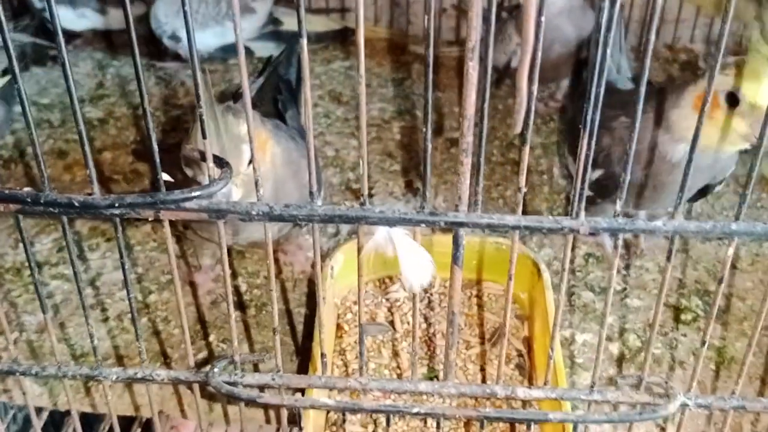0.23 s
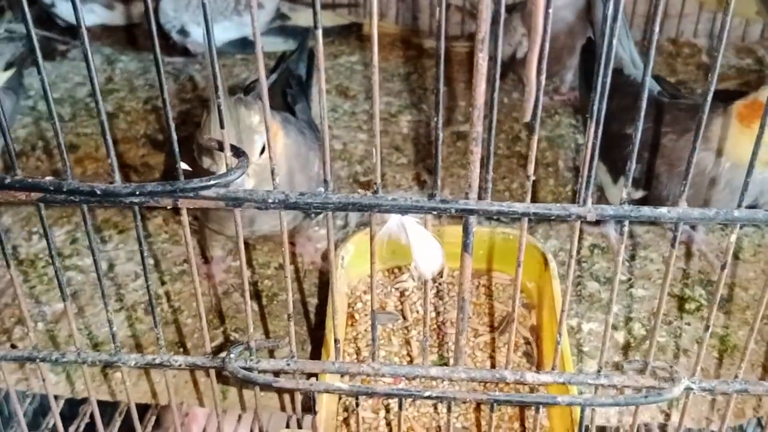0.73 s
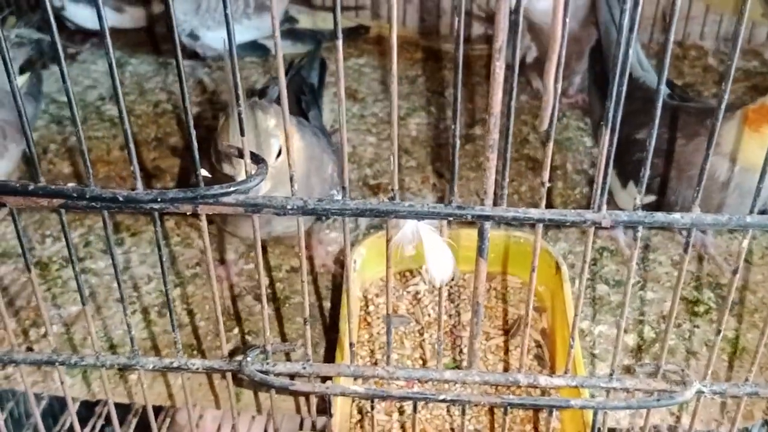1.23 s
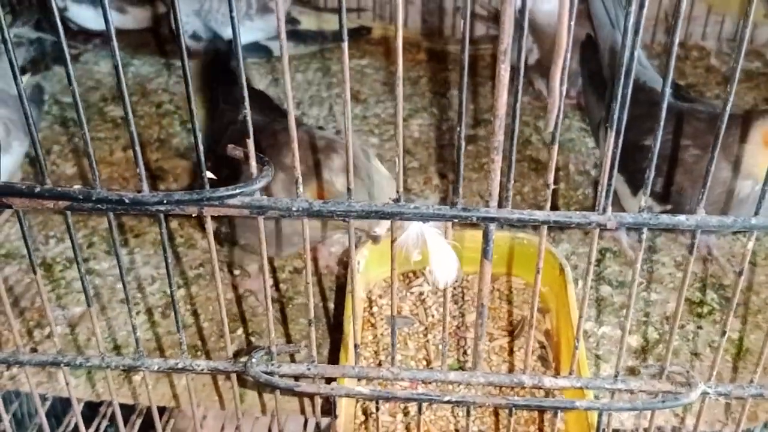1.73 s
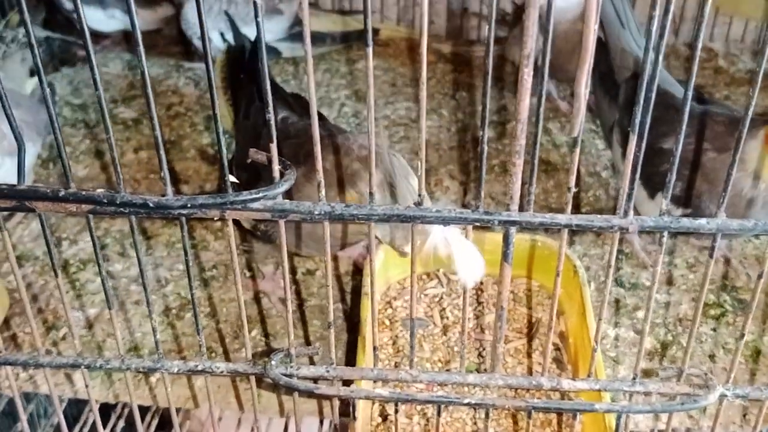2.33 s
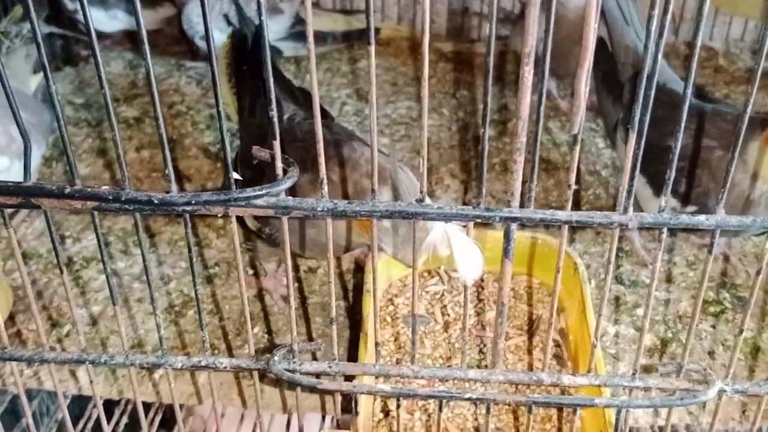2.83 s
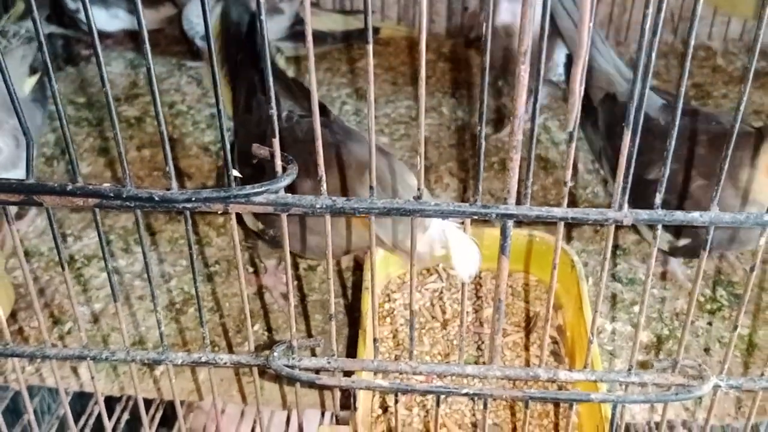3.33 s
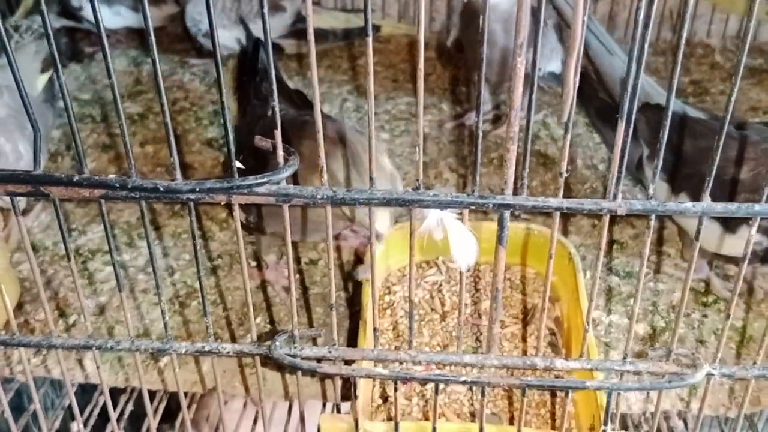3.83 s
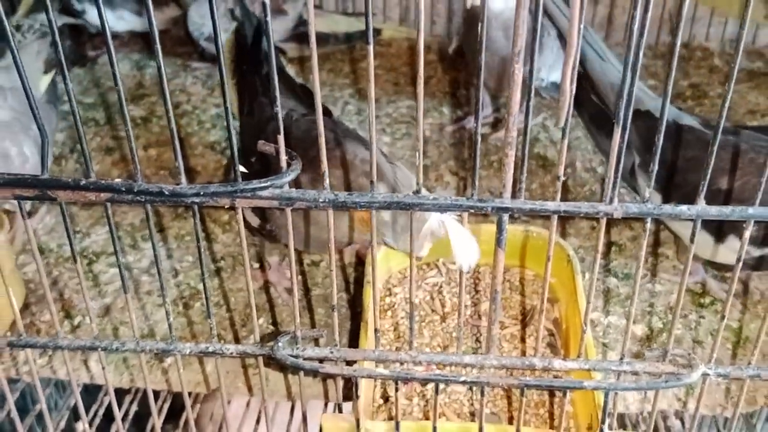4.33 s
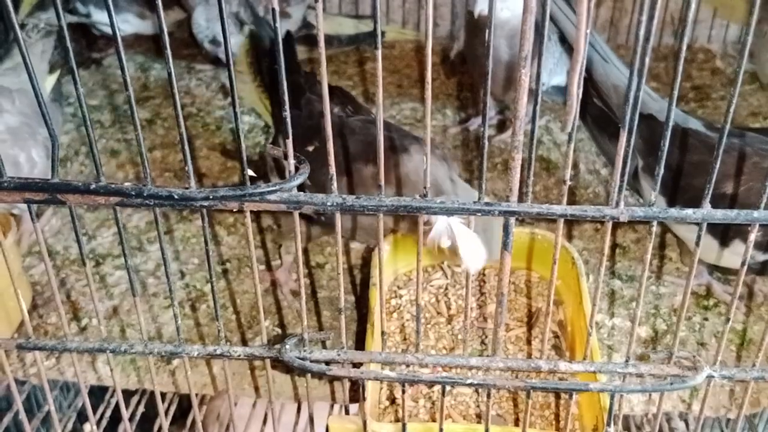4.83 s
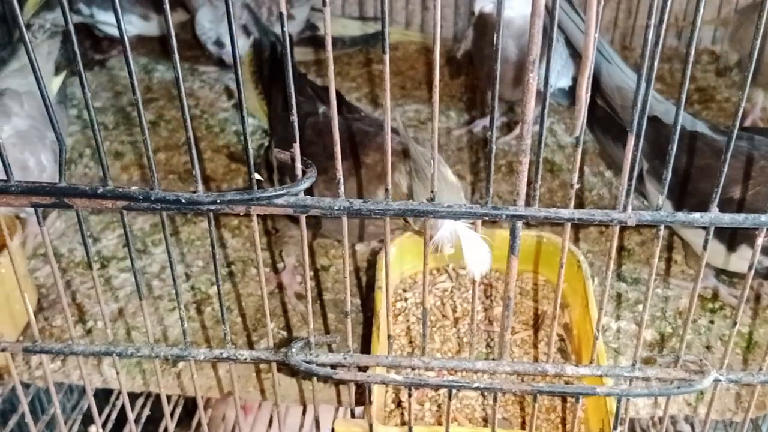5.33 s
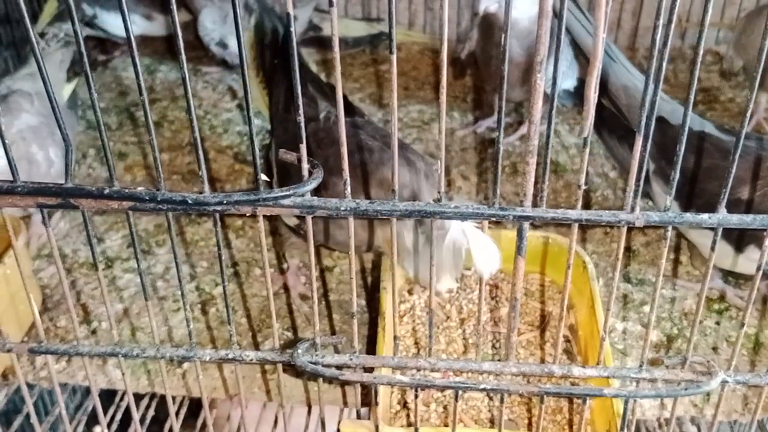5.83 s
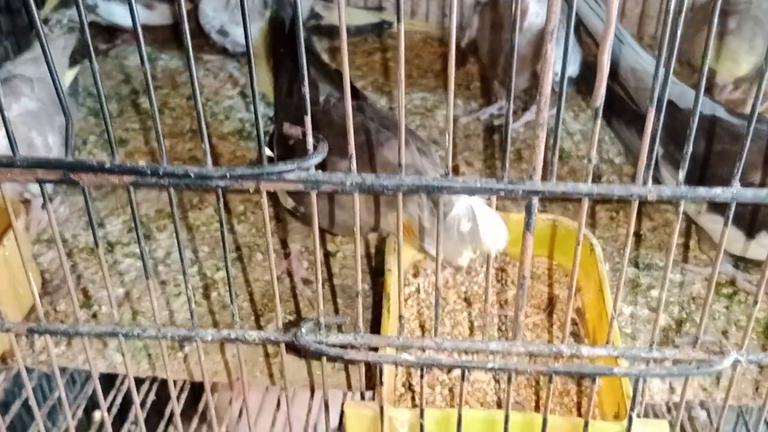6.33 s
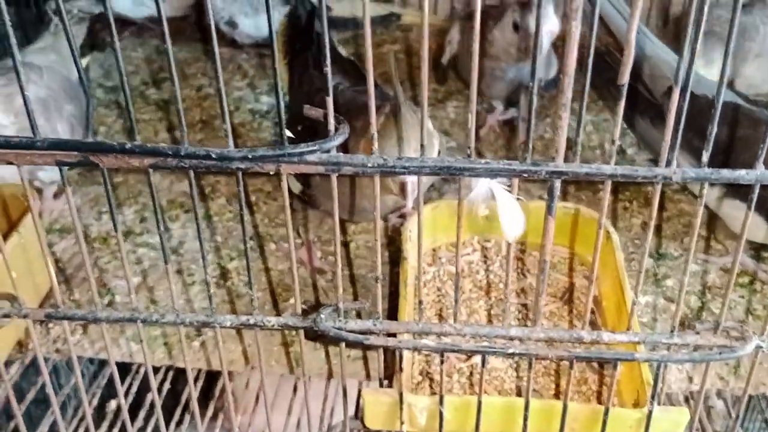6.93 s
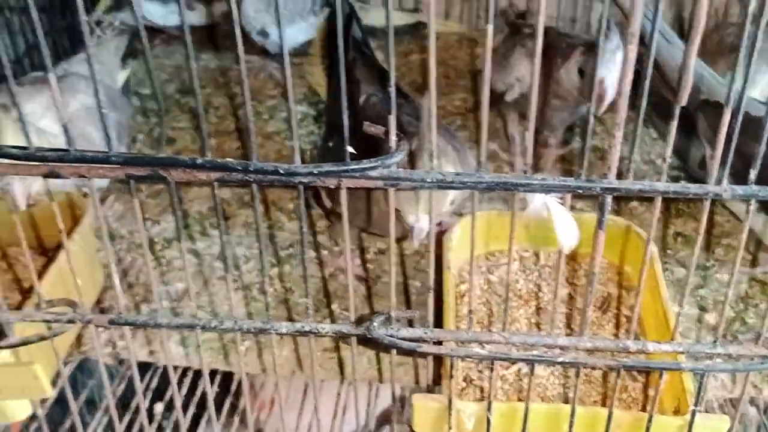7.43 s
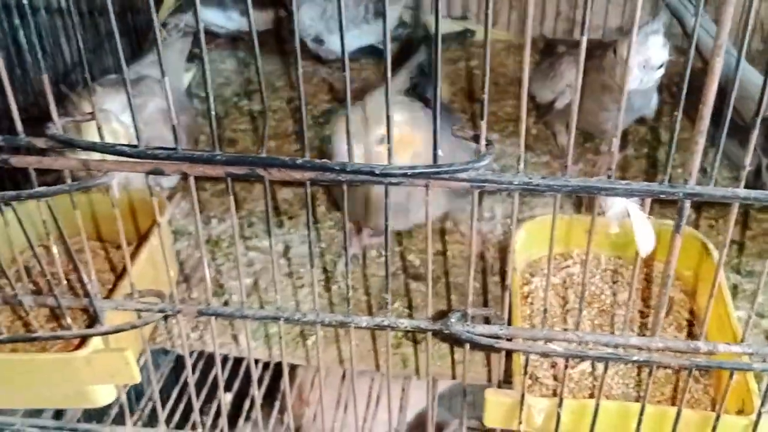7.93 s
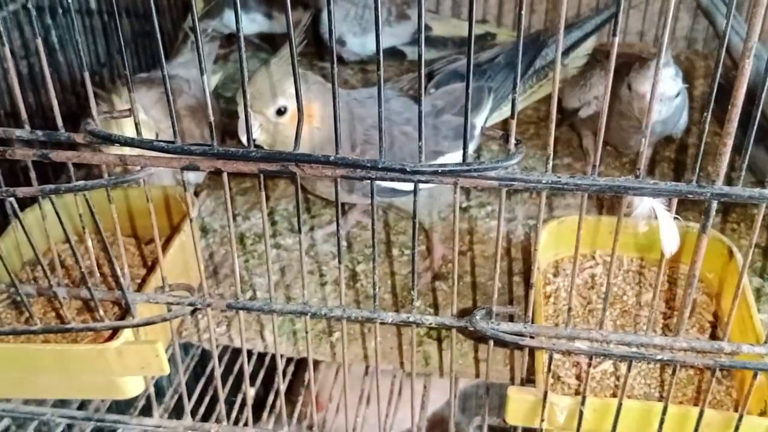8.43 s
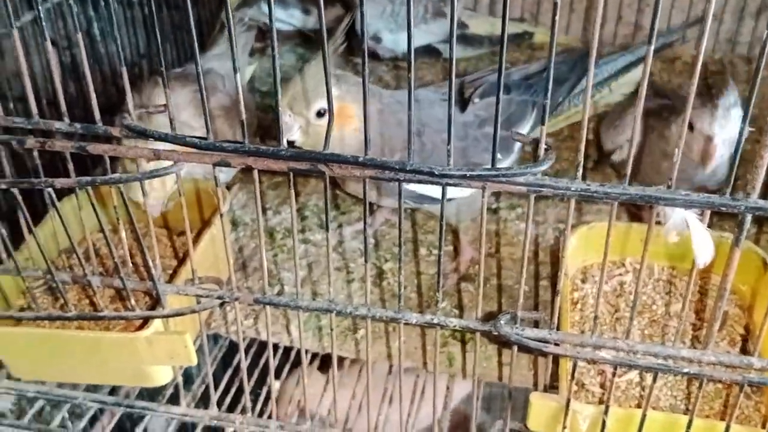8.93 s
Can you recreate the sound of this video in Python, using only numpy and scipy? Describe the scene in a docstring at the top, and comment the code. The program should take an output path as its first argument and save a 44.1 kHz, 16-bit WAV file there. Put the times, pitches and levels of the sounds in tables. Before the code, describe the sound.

Cockatiels whistle in trembling arched calls, chirp and squawk hoarsely close up in a hard-walled aviary, with a faint hum and brief abrupt silences.

```python
"""Cockatiels whistle in arched, trembling calls, heard close up in a small hard-walled aviary.
A harmonic syrinx tone sings these whistles, short chirps, swooping chatter, screams and a thin warble.
Irregularly pulsed noise and lurching tones make hoarse squawks, high rasps, soft clucks and one knock.
Shaped noise gives wing flutters, swelling soft noise, a low wavering hum and a wash of birds further off.
Five times the sound cuts to dead silence for about 0.3 s."""
import sys
import numpy as np
from scipy import signal
from scipy.fft import rfft, irfft, next_fast_len
from scipy.io import wavfile
from scipy.ndimage import map_coordinates

SR = 44100
rng = np.random.default_rng(int(sys.argv[2]) if len(sys.argv) > 2 else 0)


def waveform_to_disk(signal):
    """Save audio, clipped to [-1, 1], as 16-bit WAV at the path in sys.argv[1]."""
    frames = np.transpose(np.atleast_2d(signal))
    scaled = np.clip(frames, -1, 1) * 32767
    samples = np.round(scaled).astype(np.int16)
    wavfile.write(sys.argv[1], SR, samples)


N = 405279
TIME = np.arange(N) / SR  # s
# every level_db below is relative: sources add their own trims, colours and room


def undb(db):
    """Decibels to gain."""
    return 10 ** (np.asarray(db) / 20)


def unit(x):
    """Scale to rms 1."""
    return x / np.sqrt(np.mean(x ** 2) + 1e-18)


def gain_at(hz, colour):
    """Gain of a (freq_hz, gain_db) colour at these frequencies."""
    points, db = np.transpose(colour)
    return undb(np.interp(np.log(hz + 1), np.log(points), db))


def tint(x, colour):
    """Filter a sound by a colour."""
    size = next_fast_len(N + 4096)
    hz = np.arange(size // 2 + 1) * SR / size
    return irfft(rfft(x, size) * gain_at(hz, colour), size)[:N]


def noise(colour):
    """Coloured noise of rms 1."""
    return unit(tint(rng.standard_normal(N), colour))


def walk(rate):
    """Random drift of spread 1 that heads for a new value rate times a second."""
    values = rng.standard_normal(N // 16)
    # straight lines between values lose spread; the root restores it
    return np.sqrt(3 / 2) * np.interp(TIME * rate, np.arange(N // 16), values)


def gate(start, end, attack, release):
    """The samples of one call and its smooth opening and closing."""
    span = slice(max(int((start - attack / 2) * SR), 0), int((end + release / 2) * SR))
    t = TIME[span]
    opening = np.clip(np.minimum((t - start) / attack, (end - t) / release) + .5, 0, 1)
    return span, np.sin(opening * np.pi / 2) ** 2


def bursts(table, attack, release):
    """Loudness over time of (start_s, length_s, level_db) calls, each swelling towards its middle."""
    out = np.zeros(N)
    for start, length, db in table:
        span, opening = gate(start, start + length, attack, release)
        arch = np.sqrt(np.hanning(len(opening)))
        out[span] += opening * arch * undb(db + 3.0)  # 3 dB makes up for the arch
    return out


def patchy(x, depth_db, rate, size):
    """Let size bands of a sound flicker, each on its own, rate times a second."""
    hz, t, spectra = signal.stft(x, SR, nperseg=1024)
    chance = rng.standard_normal((int(N / SR * rate) + 2, size))
    band = np.sqrt(hz / hz[-1]) * (size - 1)
    flicker = map_coordinates(chance, np.meshgrid(t * rate, band), mode="mirror")
    return unit(signal.istft(spectra * undb(depth_db * flicker), SR)[1][:N])


def harsh(colour, pulse_hz, depth):
    """Noise chopped by pulses of wandering rate, ringing in a colour."""
    phase = 2 * np.pi * np.cumsum(pulse_hz * (1 + 0.26 * walk(110))) / SR
    return unit(tint(np.exp(depth * np.cos(phase)) * rng.standard_normal(N), colour))


# loudness line of the low hum: time_s [s], level_db [dB]
HUM_LEVELS = [(.15, -62), (.45, -33), (.84, -36), (1.15, -50.5), (1.85, -45.5), (2.2, -39), (5.01, -39),
              (5.91, -34.5), (6.75, -33.5), (7.61, -37), (8.1, -47), (8.45, -33.5), (9.11, -38)]
# spectrum of the hum: freq_hz [Hz], gain_db [dB]
HUM_COLOUR = [(27, -49.5), (64, -20), (96, -0.5), (148, 4), (186, -16), (305, -21.5), (4000, -94.5)]
# spectrum of the distant wash: freq_hz [Hz], gain_db [dB]
WASH_COLOUR = [(41, -27.5), (470, -5.5), (660, -4), (850, -4.5), (1310, 3.5), (2110, 4.5), (3010, -9),
               (4210, -31.5), (5600, -35.5), (6600, -18), (7600, -17), (9010, -41.5), (15100, -72)]


def background(drone_db, far_db):
    """An uneven low hum and the wash of birds further off, both from flickering noise."""
    rumble = patchy(noise(HUM_COLOUR), depth_db=5.0, rate=17, size=170)
    level_db = np.interp(TIME, *np.transpose(HUM_LEVELS))
    waver_db = 2.4 * np.tanh(walk(7))
    hum = rumble * undb(drone_db + level_db + waver_db)
    wash = patchy(noise(WASH_COLOUR), depth_db=6.2, rate=14, size=90)
    return hum + undb(far_db) * wash


# swells of soft broadband noise around the calls: loudest_s [s], length_s [s], level_db [dB]
NOISE_SWELLS = [(0.053, 0.32, -35), (0.451, 0.2, -36.5), (2.974, 0.34, -38), (3.259, 0.15, -34.5),
                (3.58, 0.61, -39.5), (4.39, 0.4, -33.5), (5.932, 0.99, -37.5), (6.868, 1, -38),
                (8.068, 0.52, -35.5), (8.28, 0.3, -38), (9.14, 0.1, -35)]
# spectrum of the soft noise: freq_hz [Hz], gain_db [dB]
SOFT_COLOUR = [(50, -28.5), (255, -14), (460, -16), (640, 0), (1360, -4), (2810, -1), (4300, -25.5),
               (7020, -17.5), (9020, -44.5), (15200, -67.5)]
NOISE_REST_DB = -46  # soft noise between the swells, before the trim


def swelling_noise(level_db):
    """Soft, flickering broadband noise rises and falls in straight-sided swells."""
    swell = undb(NOISE_REST_DB)
    for loudest, length, db in NOISE_SWELLS:
        swell = swell + undb(db) * np.maximum(1 - 2 * np.abs(TIME - loudest) / length, 0)
    soft_noise = patchy(noise(SOFT_COLOUR), depth_db=3.5, rate=22, size=110)
    return soft_noise * swell * undb(level_db + 4.53 * walk(32))


# wing flutters: start_s [s], length_s [s], level_db [dB]
FLUTTERS = [(5.801, 0.15, -42), (6.471, 0.1, -44), (6.69, 0.14, -42), (7.97, 0.2, -45)]
# spectrum of the air the wings push: freq_hz [Hz], gain_db [dB]
FLUTTER_COLOUR = [(61, -30.5), (215, 4.5), (360, 12.5), (500, 5), (2010, -4.5), (12000, -75.5)]


def wings(level_db):
    """Wings push air: low noise in short bursts of unsteady level."""
    air = noise(FLUTTER_COLOUR) * bursts(FLUTTERS, attack=0.059, release=0.017)
    return air * undb(level_db + 0.89 * walk(41))


# a rattling knock in the cage: start_s [s], length_s [s], level_db [dB]
KNOCKS = [(.922, 0.022, -29.5)]


def knock():
    """Something bumps in the cage and chatters briefly against it: a burst of pulsed noise."""
    body = [(300, -26), (600, 2), (1300, 2), (4000, -31.5)]  # freq_hz, gain_db
    return harsh(body, pulse_hz=190, depth=1.6) * bursts(KNOCKS, attack=.002, release=0.011)


# soft low clucks: start_s [s], length_s [s], level_db [dB]
CLUCKS = [(4.339, 0.026, -35), (4.951, 0.017, -38), (6.954, 0.023, -30), (7.119, 0.019, -33.5)]


def clucks(level_db):
    """Brief hollow bursts of pulsed noise, ringing near 900 Hz."""
    hollow = [(400, -2.0), (650, 2.5), (920, 17.5), (1600, -40)]  # freq_hz, gain_db
    voice = harsh(hollow, pulse_hz=200.5, depth=0.53)
    return undb(level_db) * voice * bursts(CLUCKS, attack=0.012, release=0.0032)


# high hissing rasps: start_s [s], length_s [s], level_db [dB], beak_hz [Hz] (beak resonance)
RASPS = [(0.995, 0.047, -43.5, 6900), (1.079, 0.033, -45, 5950), (3.19, 0.061, -37, 6670),
         (3.295, 0.058, -36, 5830), (3.355, 0.099, -37.5, 6700), (3.754, 0.13, -39, 6300),
         (4.067, 0.046, -35.5, 6280), (4.754, 0.076, -31, 6800), (5.477, 0.064, -42, 6700),
         (6.295, 0.082, -34.5, 6520), (6.468, 0.043, -38, 6800), (7.527, 0.2, -45.5, 7100),
         (8.806, 0.053, -33.5, 6400), (9.068, 0.091, -39.5, 6900)]
# spectrum of the rasping voice: freq_hz [Hz], gain_db [dB]
RASP_COLOUR = [(2010, -23.5), (4010, 2), (5500, 5), (6700, 4.5), (8510, -12), (15100, -23.5)]


def rasps(level_db, spread, skirt_db):
    """A lurching buzz in uneven spurts of air rings each beak at its own pitch; soft rasps are duller."""
    phase = 2 * np.pi * np.cumsum(1380 * (1 + 0.068 * walk(130))) / SR
    pulses = np.exp(30 * (np.cos(phase) - 1))  # narrow, so rich in high overtones
    buzz = unit(tint(pulses, RASP_COLOUR + [(SR / 2, -60)]))
    buzz = unit(np.diff(buzz, prepend=buzz[0]))  # a small beak radiates the change of flow
    air = harsh(RASP_COLOUR, pulse_hz=169.0, depth=0.99)
    voice = patchy(air + buzz, depth_db=7.0, rate=35, size=60) * undb(2 * walk(190))
    out = np.zeros(N)
    loudest_db = max(db for _, _, db, _ in RASPS)
    for start, length, db, hz in RASPS:
        top_db = (db - loudest_db) * 0.64
        beak = [(hz / spread, skirt_db), (hz, 0), (hz * spread, skirt_db), (hz * 2, top_db)]
        out += unit(tint(voice, beak)) * bursts([(start, length, db)], attack=.03, release=.05)
    return undb(level_db) * out


# hoarse squawks: start_s [s], length_s [s], level_db [dB]
SQUAWKS = [(1.385, 0.086, -26), (2.04, 0.13, -28), (3.19, 0.072, -26), (3.351, 0.099, -31.5),
           (3.495, 0.092, -27), (3.64, 0.097, -23.5), (3.735, 0.062, -19.5), (4.071, 0.1, -22.5),
           (4.485, 0.062, -22.5), (4.771, 0.13, -24.5), (5.474, 0.085, -26.5), (6.171, 0.2, -26),
           (6.475, 0.22, -32), (6.735, 0.07, -27), (7.051, 0.082, -26.5), (8.222, 0.05, -22),
           (8.811, 0.093, -26.5), (9.051, 0.083, -23)]
# spectrum of hoarse breath: freq_hz [Hz], gain_db [dB]; it also airs the sung calls
SQUAWK_COLOUR = [(410, -17.5), (1310, -13), (2910, 1), (3610, -2.5), (4410, -14.5), (6510, -18),
                 (15200, -51)]


def squawks(loud_db, core_hz):
    """Chaotic voice: two lurching, sputtering tones, one per side of the syrinx, inside chopped air."""
    tones = np.zeros(N)
    for side in (.88, 1.14):
        hz = core_hz * side * (1 + .095 * walk(65) + .022 * walk(820))
        sputter = undb(2 * np.sqrt(2) * walk(150))
        tones += np.sin(2 * np.pi * np.cumsum(hz) / SR) * sputter
    air = harsh(SQUAWK_COLOUR, pulse_hz=242.6, depth=0.93)
    voice = patchy(air, depth_db=7, rate=45, size=60) + 1.3 * tones
    return undb(loud_db) * unit(voice) * bursts(SQUAWKS, attack=0.0063, release=0.04)


TRILL_SHARE = .1  # share of the pitch the trill bends at full slackness and roughness


def syrinx(calls, throat, trill_hz, scatter, flicker_db, air_db):
    """A throat-coloured harmonic tone whose membranes tremble when slack and steady near 3 kHz.

    Each call is (times, pitches, levels, overtone lift, roughness)."""
    tremble = np.sin(2 * np.pi * np.cumsum(trill_hz * (1 + .22 * walk(44))) / SR)
    jitter = scatter * walk(880)
    shimmer = undb(flicker_db * walk(165))
    air = undb(air_db) * noise(SQUAWK_COLOUR)
    k = np.arange(1, 8)[:, None]  # harmonic numbers
    out = np.zeros(N)
    for s, pitch, db, lift_db, rough in calls:
        span, opening = gate(s[0], s[-1], attack=.0045, release=0.0053)
        curves = (np.broadcast_to(v, len(s)) for v in (pitch, db, lift_db))
        hz, level, lift = (np.interp(TIME[span], s, v) for v in curves)
        # the voice is steadiest and purest on the resonance of the throat
        slack = np.clip(np.abs(hz - 3000) / 650, .7 * rough, 1)
        hz = hz * (1 + slack * rough * (TRILL_SHARE * tremble[span] + jitter[span]))
        phase = 2 * np.pi * np.cumsum(hz) / SR
        partials = gain_at(k * hz, throat) / k ** 1.65 * (k * hz < SR / 2)
        partials[1:] *= slack * undb(lift)
        tone = (partials * np.sin(k * phase)).sum(0)
        tone = np.sqrt(2) * tone / np.linalg.norm(partials, axis=0)  # even loudness
        breath = slack * rough * air[span]
        out[span] += (tone * shimmer[span] ** slack + breath) * opening * undb(level)
    return out


# a thin, high warble: time_s [s], pitch_hz [Hz], level_db [dB]
WARBLE = [(8.48, 6400, -49), (8.575, 7400, -45), (8.6, 6110, -32.5), (8.672, 6560, -36)]
# throat resonance, shared by warble, chirps and whistles: freq_hz [Hz], gain_db [dB]
THROAT = [(1210, -11), (1710, -4.5), (2310, 6.5), (3010, 9.5), (4210, -0.5), (5510, -9), (6810, -10.5),
          (9300, -30), (11800, -26), (15200, -36)]


def warble(lift_db, rough):
    """A thin, nearly pure syrinx tone with a deep, quick vibrato."""
    calls = [(*np.transpose(WARBLE), lift_db, rough)]
    return syrinx(calls, THROAT, trill_hz=69.2, scatter=.01, flicker_db=4, air_db=-22)


# screams, one curve for each bird: time_s [s], pitch_hz [Hz], level_db [dB], overtone_lift_db [dB]
SCREAMS = [
    [(8.205, 3103, -22, -15), (8.235, 3100, -16, -7.5), (8.25, 2606, -20.5, 4), (8.285, 2636, -29, -9)],
    [(8.25, 1750, -26, -5.5), (8.31, 2239, -16.5, -17), (8.345, 2850, -18, -4.5), (8.375, 2335, -23, -4),
     (8.435, 2275, -20, -20), (8.47, 2030, -25, -26.5)],
    [(8.34, 2254, -19, 1), (8.36, 1988, -18, -1), (8.405, 2006, -22, -14.5), (8.445, 2086, -20.5, -9.5),
     (8.475, 1567, -35, 4)],
]
# resonance of the wide-open beak: freq_hz [Hz], gain_db [dB]
OPEN_THROAT = [(2100, 0), (3000, -1), (4200, 14.5), (5800, 13), (8400, -0.5), (11300, 6), (13500, -1),
               (15000, -14)]


def screams(loud_db, rough):
    """Three birds scream across each other; wide-open beaks favour the overtones."""
    calls = [(*np.transpose(curve), rough) for curve in SCREAMS]
    voice = syrinx(calls, OPEN_THROAT, trill_hz=89.2, scatter=0.028, flicker_db=3, air_db=-20)
    return undb(loud_db) * voice


# swoops in the chatter: lowest_s [s], level_db [dB]
SWOOPS = [(4.804, -27), (4.842, -22), (5.481, -28), (6.503, -26.5)]


def swoops(length, low_hz, rim_hz, lift_db, rough):
    """In scolding chatter the pitch plunges and springs straight back, along a parabola."""
    u = np.linspace(-1, 1, 9)  # 0 at the lowest moment
    pitch = low_hz + (rim_hz - low_hz) * u ** 2
    return [(lowest + length * u / 2, pitch, db, lift_db, rough) for lowest, db in SWOOPS]


# short chirps: start_s [s], length_s [s], middle_hz [Hz], slide_hz [Hz] (first to last),
# level_db [dB] (middle), roughness [0-1]
CHIRPS = [(0.183, .008, 2550, 0.5, -18.5, 0.07), (0.846, 0.033, 3238, -350, -15, 0.3),
          (1.376, 0.014, 3660, -450, -23.5, 0.3), (1.426, 0.016, 3650, -350, -20, 0.3),
          (2.009, 0.05, 3353, -330, -29.5, 0.25), (2.597, 0.02, 3185, -500, -15, 0.46),
          (3.136, 0.067, 2966, 456, -32, .3), (3.482, 0.046, 3060, 2, -27, 0.5),
          (3.548, 0.016, 3460, -500, -20.5, 0.4), (3.704, .05, 3613, 1, -24, .4),
          (4.277, 0.016, 2756, -100, -21.5, 0.3), (4.337, 0.031, 2875, -800, -23, .6),
          (4.406, 0.036, 3335, -500, -25, 0.5), (4.43, 0.067, 2464, 49.5, -26.5, 0.1),
          (4.813, .049, 3440, -580, -19.5, 0.4), (4.861, .051, 3505, 54.5, -19, .8),
          (5.485, .036, 3374, 227, -19.5, 0.4), (5.549, 0.053, 3410, -200, -23.5, 0.5),
          (5.671, .068, 2990, -670, -33.5, 0.5), (6.16, 0.044, 2590, 173, -28.5, 0.77),
          (6.465, 0.031, 3096, 750, -23, 0.7), (6.499, .06, 4454, -100, -23, 0.2),
          (6.501, .135, 3404, 155.5, -24, 0.9), (6.651, 0.034, 3134, 124, -23.5, 0.87),
          (6.703, 0.019, 3610, -5, -25, 0.3), (6.73, .025, 3070, 346, -19.5, 0.5),
          (6.763, .04, 3577, 108.5, -23, 0.02), (7.507, 0.014, 2990, 870, -27.5, 0.77),
          (7.885, 0.037, 3604, 1, -30, 0.3), (7.915, 0.0254, 3110, 399, -19.5, 0.65),
          (7.945, 0.047, 3540, 96, -24.5, 0.4), (8.502, 0.036, 3294, -5, -27, 0.7),
          (8.577, 0.05, 3230, -950, -26.5, 0.16), (8.799, 0.044, 3030, -880, -26, 0.86),
          (8.84, 0.054, 3484, -31, -23, 0.82), (9.015, .022, 3510, 353, -26.5, .6),
          (9.036, 0.036, 2844, -5, -26, 0.77)]
CHIRP_BOW_HZ = 114  # both ends of a chirp droop by this much


def chirps(loud_db, taper_db, lift_db):
    """Quick, slightly bowed slides of pitch, clean or buzzy, loudest mid-chirp; swoops come between."""
    u = np.array([-1, 0, 1])  # first, middle, last
    calls = []
    for start, length, hz, slide, db, rough in CHIRPS:
        times = start + length * (u + 1) / 2
        pitch = hz + slide * u / 2 - CHIRP_BOW_HZ * u ** 2
        calls.append((times, pitch, db + taper_db * u ** 2, lift_db, rough))
    calls += swoops(length=0.02, low_hz=1837, rim_hz=3150, lift_db=-2, rough=0.4)
    voice = syrinx(calls, THROAT, trill_hz=152.0, scatter=0.05, flicker_db=3.0, air_db=-3.5)
    return undb(loud_db) * voice


# arched whistles: start_s [s], crest_s [s], end_s [s], aim_hz [Hz] (pitch strained for), last_hz [Hz],
# level_db [dB] (highest pitch, before the lock), overtone_lift_db [dB] (at MIDDLE_HZ), roughness [0-1]
WHISTLES = [(0.037, 0.1, .172, 2837, 1900, -18, -9, 0.55), (0.153, 0.215, .254, 3520, 2610, -21, -18, 0.6),
            (0.35, 0.468, .592, 2485, 2105, -17.5, -4, 0.47), (0.742, .803, .85, 2510, 2147, -18, -4, 0.69),
            (1.222, 1.342, 1.425, 3524, 1743, -15, 0, 0.59),
            (1.524, 1.648, 1.755, 2391, 1807, -24, 11.5, 0.55),
            (2.036, 2.145, 2.29, 2189, 1898, -32, 7.5, 0.46),
            (2.865, 2.974, 3.0, 2680, 2022, -15.5, 1.5, 0.57),
            (4.077, 4.168, 4.196, 3207, 2825, -24, 5.5, 0.55),
            (4.456, 4.516, 4.582, 2824, 2010, -19, 0.5, 0.8),
            (4.557, 4.604, 4.626, 3520, 2900, -20, 6, 0.46),
            (5.771, 5.879, 5.985, 3264, 1650, -18, 6.5, 0.65),
            (6.905, 7.02, 7.14, 2598, 1785, -16.5, -1, 0.75),
            (7.575, 7.662, 7.71, 2800, 2030, -19, -2.5, 0.86),
            (7.69, 7.739, 7.77, 3510, 2830, -20.5, -17, 0.57),
            (8.03, 8.099, 8.135, 2867, 2580, -28.5, 18.5, 0.7),
            (8.515, 8.592, 8.63, 2474, 1985, -22, -1.5, 0.68),
            (8.605, 8.654, 8.685, 2404, 2256, -24, 0, 0.71)]
FIRST_HZ = 1655  # every whistle starts from this slack pitch
CEILING_HZ = 2991  # the pitch locks on the resonance of the throat and goes no higher
LOCK_DB = 2.5  # the voice jumps in level while it is locked on the resonance
SWELL_DB_PER_OCTAVE = 16.5  # a whistle grows louder as it climbs
OVERTONE_DB_PER_OCTAVE = 14  # and purer: the slack voice is reedy
MIDDLE_HZ = 2150  # the pitch at which a whistle has its listed overtone lift


def whistles():
    """Pitch eases up to a crest and falls back, flat-topped at the ceiling; loudness follows pitch."""
    calls = []
    for start, crest, end, aim_hz, last_hz, db, lift_db, rough in WHISTLES:
        s = np.arange(start, end, 1 / 1000)
        climb = np.sin(np.interp(s, [start, crest], [0, np.pi / 2])) ** 2
        target = np.interp(s, [crest, end], [aim_hz, last_hz])
        strained = FIRST_HZ + climb * (target - FIRST_HZ)
        pitch = np.minimum(strained, CEILING_HZ)
        swell_db = SWELL_DB_PER_OCTAVE * np.log2(pitch / pitch.max())
        swell_db = swell_db + LOCK_DB * (pitch >= CEILING_HZ)
        reed_db = OVERTONE_DB_PER_OCTAVE * np.log2(MIDDLE_HZ / pitch)
        calls.append((s, pitch, db + swell_db, lift_db + reed_db, rough))
    return syrinx(calls, THROAT, trill_hz=78.14, scatter=0.036, flicker_db=3.0, air_db=-18.0)


def aviary(x, walls_db, ring_db, t60):
    """Sparse echoes of near floor and walls beat against the gliding calls; a short tail follows."""
    t = TIME[:SR // 2]
    early = (rng.random(len(t)) < .015) * rng.standard_normal(len(t))
    early = early * np.exp(-t / 0.013) * (t > .0015)
    tail = rng.standard_normal(len(t)) * undb(-60 * t / t60) * (t > .014)
    response = undb(walls_db) * early / np.linalg.norm(early)
    response = response + undb(ring_db) * tail / np.linalg.norm(tail)
    return x + signal.fftconvolve(x, response)[:N]


def scene():
    """All the birds in their aviary, over the background."""
    soft = swelling_noise(level_db=0.5) + wings(level_db=6.5) + knock()
    hoarse = clucks(level_db=3.0) + rasps(level_db=6.0, spread=1.1, skirt_db=-6)
    hoarse = hoarse + squawks(loud_db=-2.0, core_hz=2820)
    voices = warble(lift_db=-19, rough=.6) + screams(loud_db=-0.5, rough=.6)
    voices = voices + chirps(loud_db=-1.5, taper_db=-1.0, lift_db=9.0) + whistles()
    room = aviary(voices + hoarse + soft, walls_db=-4.5, ring_db=-13.0, t60=0.23)
    return (room + background(drone_db=-2.5, far_db=-40.5))[None]


# dips of the microphone port: freq_hz [Hz], gain_db [dB]
MIC = [(3710, -0.92), (4400, -9), (4900, -20.5), (5450, -7), (6210, -5), (8010, 0), (9410, -11.5),
       (10900, -7)]
# dead silences: from_s [s], to_s [s]
SILENCES = [(.5132, .8127), (2.2637, 2.561), (3.799, 4.0862), (5.153, 5.4437), (7.1931, 7.4822)]
TOP_HZ = 15800  # steep top cut


def record(dry):
    """Microphone colour, abrupt silences and the top cut."""
    live = np.ones(N)
    for start, end in SILENCES:
        live[int(start * SR):int(end * SR)] = 0
    top_cut = signal.ellip(8, .2, 70, TOP_HZ, fs=SR, output="sos")
    return signal.sosfilt(top_cut, tint(dry[0], MIC) * live)[None]


dry = scene()
out = record(dry)
waveform_to_disk(out)
```